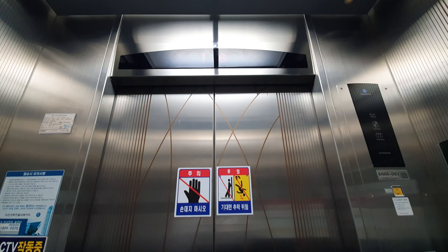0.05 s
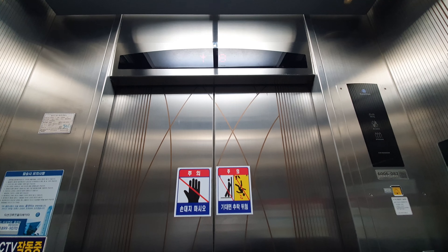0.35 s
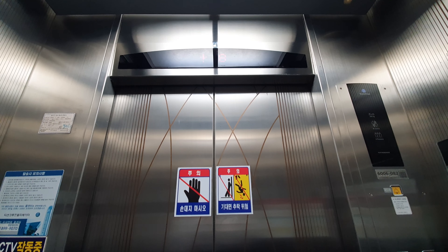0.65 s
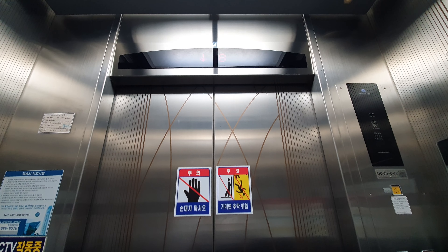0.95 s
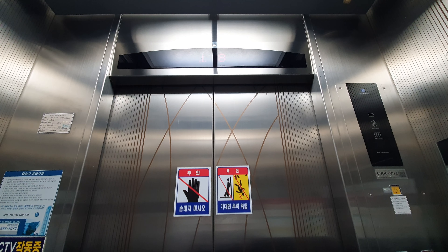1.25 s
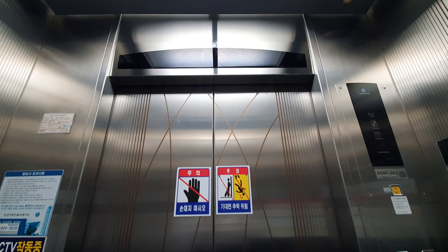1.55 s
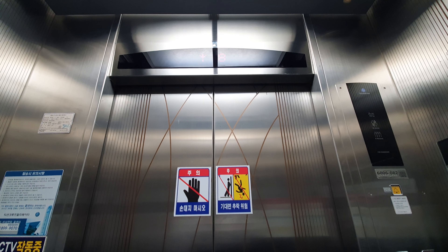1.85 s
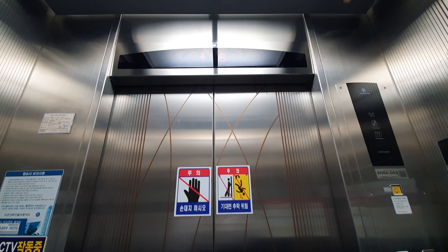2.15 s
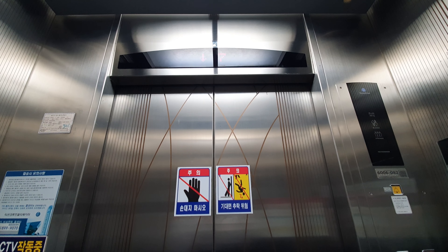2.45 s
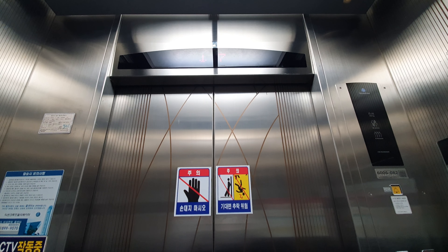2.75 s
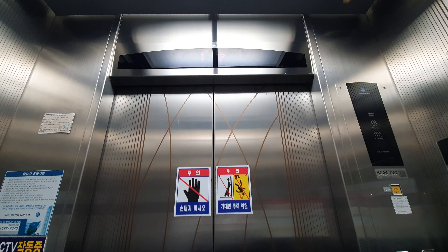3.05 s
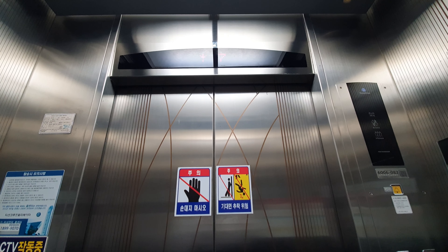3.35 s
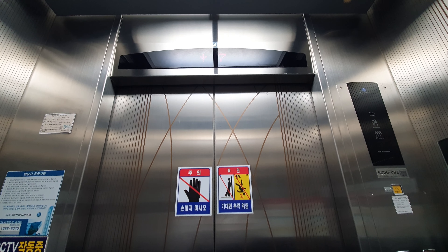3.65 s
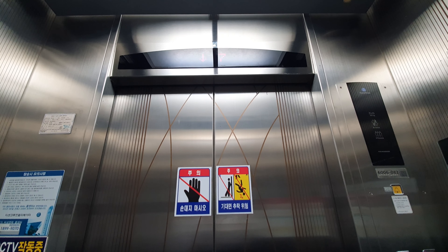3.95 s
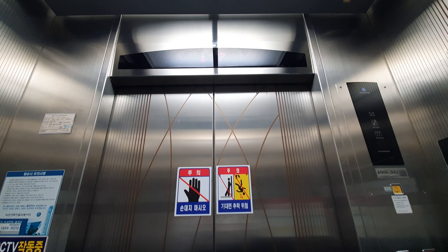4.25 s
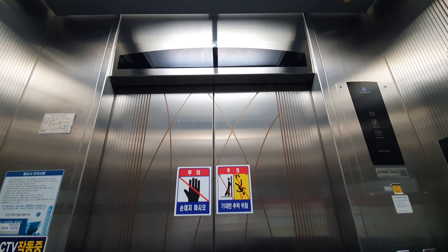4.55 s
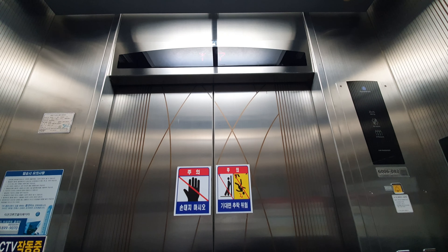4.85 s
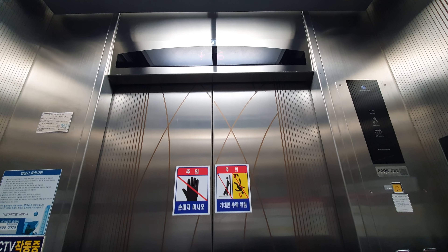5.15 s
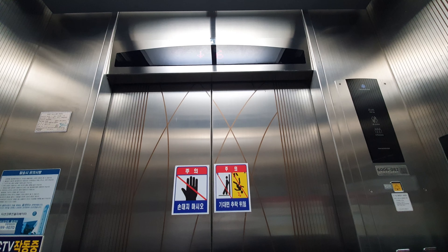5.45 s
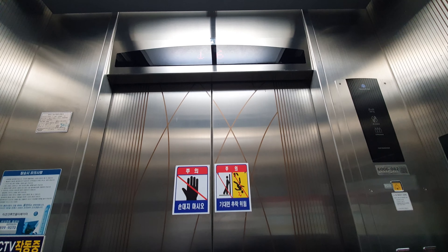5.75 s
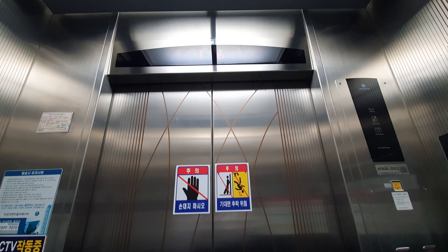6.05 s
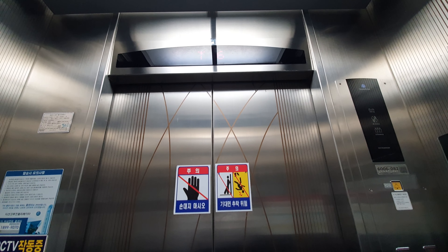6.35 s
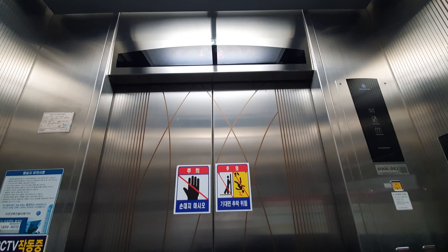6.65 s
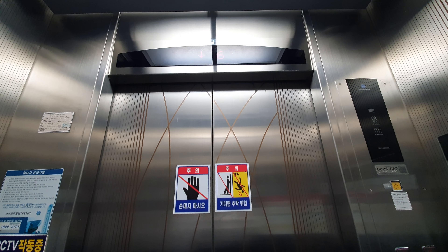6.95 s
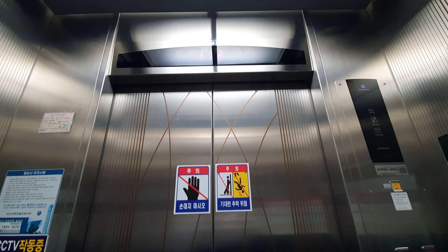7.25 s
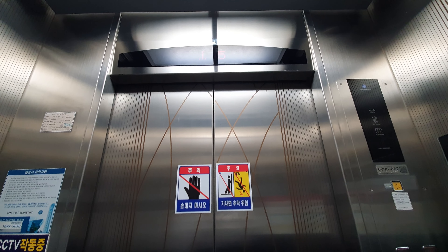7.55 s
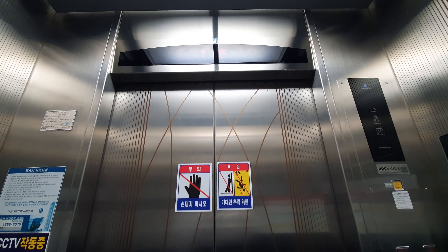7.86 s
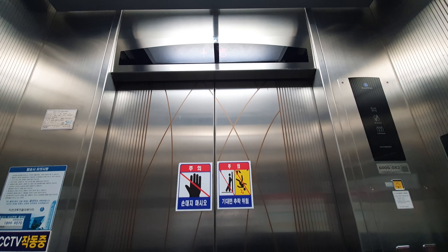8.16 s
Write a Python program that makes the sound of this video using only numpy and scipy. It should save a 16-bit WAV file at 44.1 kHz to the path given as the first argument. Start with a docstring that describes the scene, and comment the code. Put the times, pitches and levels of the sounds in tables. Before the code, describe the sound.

An elevator car rides along with a low, pulsing hum, a shuddering floor and faintly rolling guides. It opens with a bright snap and some thumps, then runs evenly until several knocks lead to one hard clack and a short latch rattle. Afterwards the throb smooths out under a few faint bumps. The microphone is inside the small cabin, whose bare steel walls give every hit a short, dense ring.

```python
"""Small steel elevator ride

The machinery hums low, two of its tones throbbing against each other. The car shudders and rumbles,
its guides roll and rub, and air rushes softly. A sharp snap, a clack and a rattling latch stand out
among weak thumps; the bare steel walls smear every knock into a short, dense ring."""
import sys
import numpy as np
from scipy import signal
from scipy.fft import rfft, irfft, next_fast_len
from scipy.io import wavfile
from scipy.ndimage import uniform_filter1d, map_coordinates

SR = 44100
rng = np.random.default_rng(int(sys.argv[2]) if len(sys.argv) > 2 else 0)


def unload_wav(signal):
    """Save mono or channel-first audio to the path in sys.argv[1] as 16-bit WAV at rate SR, clipped to [-1, 1]."""
    wavfile.write(
        sys.argv[1],
        SR,
        np.round(np.clip(np.atleast_2d(signal).T, -1, 1) * 32767).astype(np.int16),
    )


N = 369999

# effort of the drive, heard as the swell of its drone: time_s, relative_db
DRIVE_EFFORT = [(0, -56.5), (0.62, -39), (0.95, -45), (1.5, -52.5), (2.35, -59.5), (2.62, -43), (3.03, -43),
                (3.25, -53.5), (4.02, -63), (4.27, -48), (4.92, -53.5), (5.15, -41), (5.5, -46),
                (6.2, -48.5), (7.08, -42.5), (8.05, -52.5), (8.39, -48.5)]
# weaker steady tones of the drive and fan: pitch_hz, relative_db
FAINT_TONES = [(24.2,-58.5),(48.35,-53.5),(57.3,-63),(105.6,-71),(121,-66),(145.3,-75),(166,-70),(224,-69),(248.6,-70.5),(634,-82),(746,-79)]
# how hard the car floor shakes: time_s, relative_db
FLOOR_SHAKE = [(0, -44), (0.25, -49), (0.75, -43), (1.0, -47.5), (2.4, -48.5), (3.1, -50), (3.65, -51),
               (4.12, -56.5), (4.35, -49.0), (4.9, -51), (5.3, -47.0), (6.0, -49.0), (6.35, -57),
               (7.5, -52.5), (8.39, -55.5)]
# rough stretches of the ride: start_s, length_s, rumble_db, rolling_db
ROUGH_STRETCHES = [(0.271,0.55,-52.5,-59.5),(2.55,0.3,-59,-72.5),(4.124,0.86,-62,-65),(4.988,0.076,-50.5,-58),(6.0,0.17,-59.5,-62.5),(6.475,0.18,-80,-65.5)]
# the guides rub: start_s, length_s, level_db
GUIDE_RUBS = [(.28,0.59,-71),(4.32,0.45,-76),(5.02,0.23,-75),(6.16,0.17,-74.5),(7.58,0.72,-80.5)]

# tone colours of the noise beds and of a struck panel: frequency_hz, relative_db
FLOOR_EQ = [(14,-28),(30,-0.5),(42,-3.5),(54,4),(76,9),(92,0),(112,-17.5),(200,-42),(600,-100)]
RUMBLE_EQ = [(50,-22.5),(100,-3),(135,-1),(170,-9.5),(200,-12),(260,-12),(320,-14.5),(420,-55.5),(1500,-100)]
ROLLING_EQ = [(150,-7),(260,3),(360,0),(480,1),(620,-4.5),(750,-3),(860,-12),(1100,-24.5),(2000,-56.5),(6000,-84.5)]
RUBBING_EQ = [(200,-50),(600,-15.5),(900,-9),(1250,2.5),(1700,-12.5),(2500,-16.5),(5000,-28.5),(9000,-65.5)]
AIR_EQ = [(100,2.5),(700,-11),(1000,-11.5),(1800,-13.5),(2800,-17),(4000,-18),(5200,-25),(6750,-24.5),(7250,-29),(10500,-26),(13500,-25.5),(15800,-24.5)]
PANEL_EQ = [(40,-20.5),(120,-3.5),(280,1),(450,-2.5),(720,-5.5),(880,-9.5),(1650,-13.5),(2400,-19),(3000,-20),(4200,-22.5),(7000,-45.5),(16000,-61)]

# dull thumps on the car: start_s, level_db, swell_s, cutoff_hz, ring_db
THUMP_CUES = [(.199,-53.5,0.011,630,5),(.374,-48,0.0021,3050,8),(.47,-50,0.057,2500,5),(4.12,-52.5,0.0099,460,12),(4.146,-56.5,0.038,710,16),(4.54,-55,0.013,810,4.5),(5.001,-46,0.0026,504,18.5),(5.07,-46.5,0.019,380,9.5),(5.703,-60.5,.003,756,7),(5.993,-52,.0054,645,3)]
# small metal contacts: start_s, level_db, swell_s, centre_hz, width_octaves, left_over_right_db
SNAP_CUES = [(0.274,-56.5,0.0097,9800,0.67,3.5),(0.283,-66,0.051,3900,0.59,6.5),(.46,-78.5,0.069,5720,0.48,9),(.558,-70,0.01,4400,0.41,3),(4.65,-77.5,0.0053,4000,0.6,10),(5.101,-70.5,0.006,4140,0.6,6),(5.161,-65.5,0.0034,3980,0.68,4),(5.345,-79,0.0055,3140,0.67,-5)]
# rubbed steel singing: start_s, level_db, swell_s, pitch_hz
SING_CUES = [(.284,-66,0.025,3030),(0.44,-71,0.058,3060),(.57,-69.5,.02,2270),(.63,-77.5,0.073,3940),(0.881,-70,0.05,1204),(3.66,-75,0.037,1210),(4.335,-73,.054,2220),(4.785,-64.5,0.018,975)]
# harder clacks: start_s, level_db, swell_s, cutoff_hz
CLACK_CUES = [(.285,-50.5,0.0082,5000),(0.346,-53.5,0.0061,4500),(4.333,-52,0.018,2620),(4.43,-53.5,0.016,1850),(4.649,-43,0.0076,4370),(4.671,-50,0.0036,4030),(4.785,-54.5,.018,1590),(6.021,-62.5,.014,1900),(6.721,-63,.008,700)]
# the latch slides and rattles: start_s, level_db, swell_s
LATCH_CUES = [(5.006,-59.5,0.017),(5.026,-56.5,0.042),(5.161,-62,.006)]
# resonances of the latch: centre_hz, width_hz, relative_db
LATCH_MODES = [(1260,160,9.5),(1960,260,-2),(3570,250,-10.5),(4600,1100,-16.5)]

# time the cabin's ring takes to fall 60 dB: frequency_hz, decay_s
CABIN_DECAY = [(80,0.81),(300,0.29),(700,0.57),(1500,0.43),(4000,0.36),(9000,0.35),(15000,.17)]
# standing waves between the walls: centre_hz, peak_db
WALL_RESONANCES = [(221,10),(250,11),(283,9),(316,8),(373,5),(412,6),(446,7),(502,8),(530,4),(580,8),(634,9),(665,3),(703,6),(746,9),(949,5),(1079,8),(1147,7),(1462,9),(1647,9),(1926,6),(2557,6),(3004,7)]
# how alike the two channels are: frequency_hz, correlation
STEREO_LIKENESS = [(60,.965),(130,.87),(300,.91),(550,.7),(900,.3),(1400,-.08),(3000,0)]
# the cabin's lean to the left: frequency_hz, left_over_right_db
LEFT_LEAN = [(30,1),(80,.2),(130,.5),(280,2.3),(600,2.4),(2000,1.3),(12000,2)]


def amp(db):
    """Decibels to gain."""
    return 10 ** (np.asarray(db) / 20)


def unit(x):
    """x at rms 1."""
    return x / np.sqrt(np.mean(x ** 2) + 1e-20)


def along(points, hz):
    """Read (frequency, value) points on a log axis."""
    freqs, values = np.transpose(points)
    return np.interp(np.log(hz + 1), np.log(freqs + 1), values)


def fader(points):
    """Straight ramps between (time, level) points, one value a sample."""
    return np.interp(np.arange(N) / SR, *np.transpose(points))


def wobble(rate_hz):
    """A smooth random curve, rate_hz knots a second."""
    coarse_s = np.arange(0, N + 64, 64) / SR
    path = map_coordinates(rng.standard_normal(4096), [coarse_s * rate_hz], mode="mirror")
    return np.interp(np.arange(N) / SR, coarse_s, path)


def swells(cues, rise_s, fall_db_per_s):
    """Gain of (start, length, level) cues that rise, hold and die away; their powers add."""
    t = np.arange(N) / SR
    gains = []
    for start_s, length_s, db in cues:
        attack = np.clip((t - start_s) / rise_s, 0, 1)
        gains.append(attack * amp(db - fall_db_per_s * np.maximum(t - start_s - length_s, 0)))
    return np.linalg.norm(gains, axis=0)


def filtered(x, response):
    """x shaped by a frequency response."""
    size = 2 * next_fast_len(N // 2 + 8192)
    return irfft(rfft(x, size) * response(np.fft.rfftfreq(size, 1 / SR)), size)[..., :N]


def causal(gain):
    """The minimum-phase response with this gain: nothing sounds before the blow."""
    cepstrum = irfft(np.log(np.maximum(gain, 1e-6)))
    half = len(cepstrum) // 2
    cepstrum[1:half] *= 2
    cepstrum[half + 1:] = 0
    return np.exp(rfft(cepstrum))


def band(hz, centre_hz, octaves):
    """Gain of a bell-shaped band."""
    return 1 / (1 + (np.log2((hz + 1) / centre_hz) / octaves) ** 2 / 2) ** 2


def diffuse(colour):
    """Coloured stereo noise of rms 1, centred in the bass and wide in the treble."""
    def spread(hz):
        angle = np.arccos(np.clip(along(STEREO_LIKENESS, hz), -1, 1)) / 2
        return colour(hz) * np.array([np.cos(angle), np.sin(angle)])
    mid, side = filtered(rng.standard_normal((2, N)), spread)
    return unit(np.array([mid + side, mid - side]))


def rush(eq):
    """A steady stereo noise bed of rms 1."""
    return diffuse(lambda hz: amp(along(eq, hz)))


def tone(hz, drift_rad, rate_hz):
    """A sine of rms 1 whose phase wanders."""
    phase = 2 * np.pi * (hz * np.arange(N) / SR + rng.random())
    return np.sqrt(2) * np.sin(phase + drift_rad * wobble(rate_hz))


def machinery(drone_hz=82.85, second_hz=72.6, whine_hz=15013, fade_from_s=5.6, fade_db_per_s=23):
    """Two low tones beat ten times a second, amid fainter tones and a thin electronic whine."""
    drone_db = fader(DRIVE_EFFORT) - 0.5
    # the second tone follows the floor's shake, then dies away and the throb with it
    fade_db = fade_db_per_s * np.maximum(np.arange(N) / SR - fade_from_s, 0)
    second_db = fader(FLOOR_SHAKE) - 4.5 - fade_db + 2.9 * wobble(3.7)
    hum = amp(drone_db) * tone(drone_hz, drift_rad=0.11, rate_hz=9.2)
    hum += amp(second_db) * tone(second_hz, drift_rad=0.23, rate_hz=3.1)
    for hz, db in FAINT_TONES:
        hum += amp(db - 4 + 2.3 * wobble(2.59)) * tone(hz, drift_rad=hz / 450, rate_hz=7)
    whine = [amp(-97.5 + 2.5 * wobble(4) + 2 * wobble(25)) * tone(whine_hz, drift_rad=.85, rate_hz=40)
             for ear in range(2)]
    return hum + np.array(whine)


def car_rumble():
    """The floor shudders and the moving car rumbles, heaving on rough stretches."""
    shudder = amp(fader(FLOOR_SHAKE) - 1.5 + 1.8 * wobble(10)) * rush(FLOOR_EQ)
    jolts = [(start_s, length_s, db) for start_s, length_s, db, _ in ROUGH_STRETCHES]
    heave = swells(jolts, rise_s=0.051, fall_db_per_s=15)
    return shudder + np.hypot(amp(-61), heave) * amp(1.2 * wobble(8.7)) * rush(RUMBLE_EQ)


def guides():
    """The guides roll, louder on rough stretches, and rub lightly; harder rubs add a thin hiss."""
    jolts = [(start_s, length_s, db) for start_s, length_s, _, db in ROUGH_STRETCHES]
    grind = swells(jolts, rise_s=0.051, fall_db_per_s=16)
    rub = swells(GUIDE_RUBS, rise_s=0.038, fall_db_per_s=43)
    rolling = np.hypot(amp(-69.5), grind) * rush(ROLLING_EQ)
    rubbing = np.hypot(amp(-85.5), rub) * rush(RUBBING_EQ)
    hiss = amp(-21) * rub * diffuse(lambda hz: band(hz, centre_hz=6650, octaves=.07))
    return rolling + rubbing + hiss


def air():
    """Air rushes softly and evenly behind it all."""
    return amp(-73.5) * rush(AIR_EQ)


def dense_modes():
    """Flat stereo noise stands for the cabin's countless modes: frequencies, times, spectra."""
    return signal.stft(rush([(100, 0)]), SR, nperseg=128)


def strike(modes, colour, swell_s, frames=400):
    """A contact feeds the cabin's modes, which then die away; its energy is that of 50 ms at rms 1."""
    hz, times_s, spectra = modes
    age_s = times_s[:frames]
    first = rng.integers(spectra.shape[-1] - frames)
    progress = (age_s + .001) / max(swell_s, .001)
    push = (progress * np.exp(-progress)) ** 2
    decay = amp(-60 * age_s / along(CABIN_DECAY, hz)[:, None]) ** 2
    energy = signal.fftconvolve(push[None], decay, axes=1)[:, :frames]
    chatter = amp(0.91 * rng.standard_normal(frames))  # the contact is uneven
    excited = spectra[..., first:first + frames] * np.sqrt(abs(energy)) * chatter
    ring = signal.istft(excited, SR, nperseg=128)[1]
    body = irfft(causal(colour(np.fft.rfftfreq(4096, 1 / SR))))
    sound = signal.fftconvolve(ring, body[None], axes=1)
    return unit(sound) * np.sqrt(.05 * SR / sound.shape[1])


def panel(cutoff_hz, ring_hz, ring_db):
    """Colour of a struck panel: one resonance stands out; a softer contact has less treble."""
    def colour(hz):
        lift_db = ring_db * np.exp(-.5 * (np.log2((hz + 1) / ring_hz) / 0.22) ** 2)
        return amp(along(PANEL_EQ, hz) + lift_db) / np.sqrt(1 + (hz / cutoff_hz) ** 12)
    return colour


def add(track, start_s, sound):
    """Mix a sound into the track at its cue."""
    part = track[:, max(round(start_s * SR), 0):][:, :sound.shape[1]]
    part += sound[:, :part.shape[1]]


def thumps(track, modes, ring_hz=291):
    """Dull thumps wake the panels' low resonance."""
    for start_s, db, swell_s, cutoff_hz, ring_db in THUMP_CUES:
        add(track, start_s, amp(db) * strike(modes, panel(cutoff_hz, ring_hz, ring_db), swell_s))


def snaps(track, modes):
    """Small metal parts snap brightly, each with its own pan."""
    for start_s, db, swell_s, centre_hz, octaves, left_db in SNAP_CUES:
        gains = amp([[db + left_db / 2], [db - left_db / 2]])
        add(track, start_s, gains * strike(modes, lambda hz: band(hz, centre_hz, octaves), swell_s))


def singing_steel(track, modes, octaves=0.076):
    """Rubbed steel sings faintly, each time in one narrow band."""
    for start_s, db, swell_s, pitch_hz in SING_CUES:
        add(track, start_s, amp(db) * strike(modes, lambda hz: band(hz, pitch_hz, octaves), swell_s))


def clacks(track, modes, ring_hz=590, hardest_ring_db=10.5, ring_loss_per_db=3.5):
    """Clacks wake a higher panel resonance, which only the hardest hit brings out."""
    hardest_db = max(cue[1] for cue in CLACK_CUES)
    for start_s, db, swell_s, cutoff_hz in CLACK_CUES:
        ring_db = max(hardest_ring_db - ring_loss_per_db * (hardest_db - db), 0)
        add(track, start_s, amp(db) * strike(modes, panel(cutoff_hz, ring_hz, ring_db), swell_s))


def latch(track, modes):
    """A latch slides and rattles with the hollow ring of a few steel resonances."""
    def steel(hz):
        response = 0
        for k, (centre_hz, width_hz, db) in enumerate(LATCH_MODES):
            damping = 1j * hz * width_hz
            response += (-1) ** k * amp(db) * damping / (centre_hz ** 2 - hz ** 2 + damping)
        return abs(response)
    for start_s, db, swell_s in LATCH_CUES:
        add(track, start_s, amp(db) * strike(modes, steel, swell_s))


def cabin(hz):
    """Standing waves colour the car with narrow peaks and dips; the image leans a little left."""
    peaks_db = sum(db / (1 + (2 * (hz - centre_hz) / (14 + 0.0076 * centre_hz)) ** 2)
                   for centre_hz, db in WALL_RESONANCES)
    average_db = uniform_filter1d(peaks_db, size=round(130 / hz[1]))  # over 130 Hz
    pan = amp(np.array([[.5], [-.5]]) * along(LEFT_LEAN, hz))
    return causal(amp(peaks_db - average_db)) * pan


def scene():
    """The ride and the hits ring through the cabin; the hum fills it evenly."""
    modes = dense_modes()
    car = car_rumble() + guides() + air()
    for add_hits in (thumps, clacks, snaps, singing_steel, latch):
        add_hits(car, modes)
    return filtered(car, cabin) + machinery()


def record(dry):
    """A brick-wall low-pass trims the very top."""
    return filtered(dry, lambda hz: hz < 15700)


dry = scene()
out = record(dry)
unload_wav(out)
```